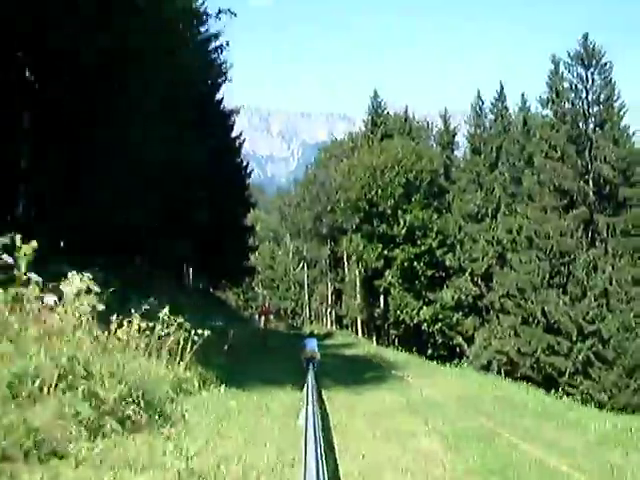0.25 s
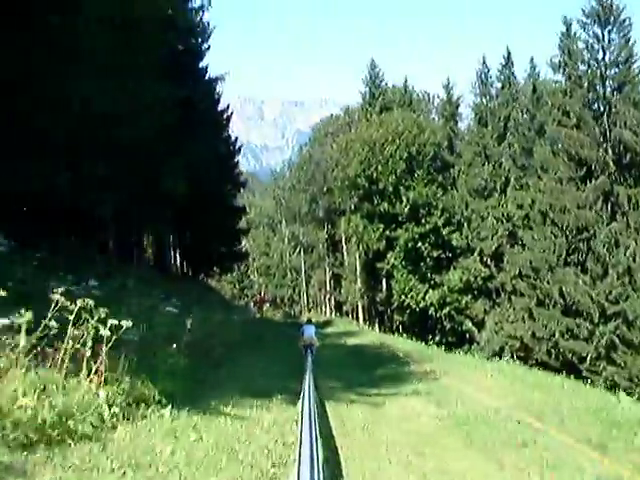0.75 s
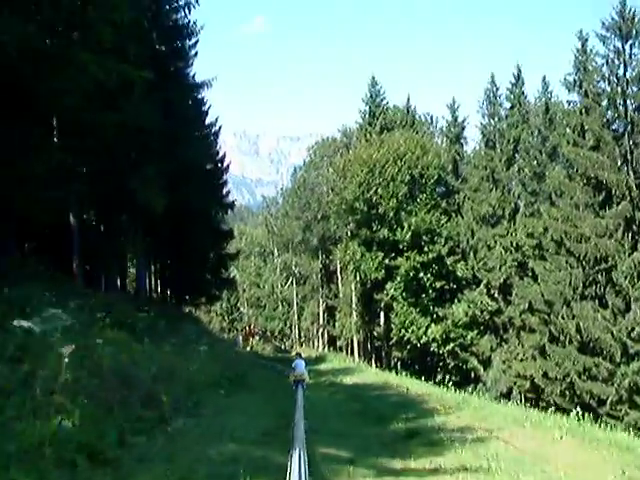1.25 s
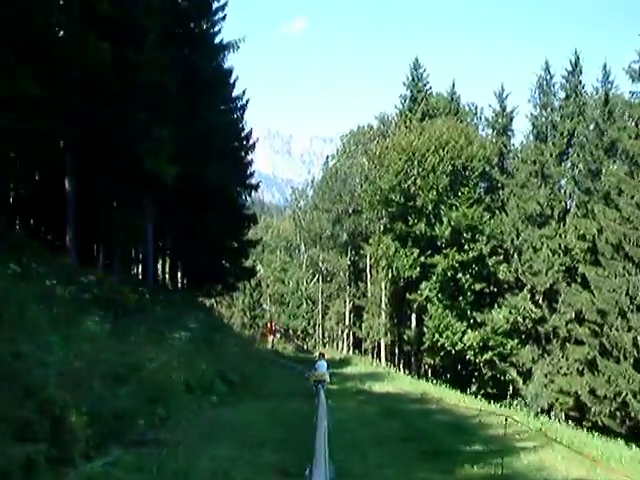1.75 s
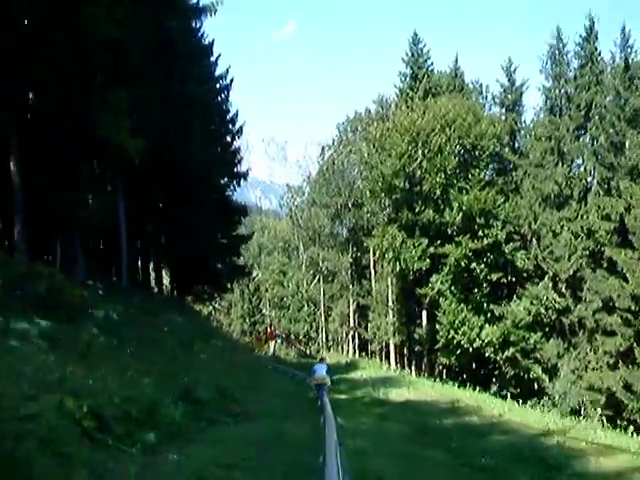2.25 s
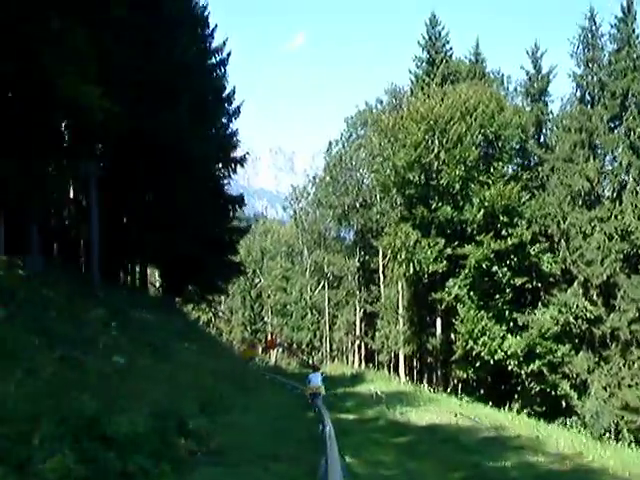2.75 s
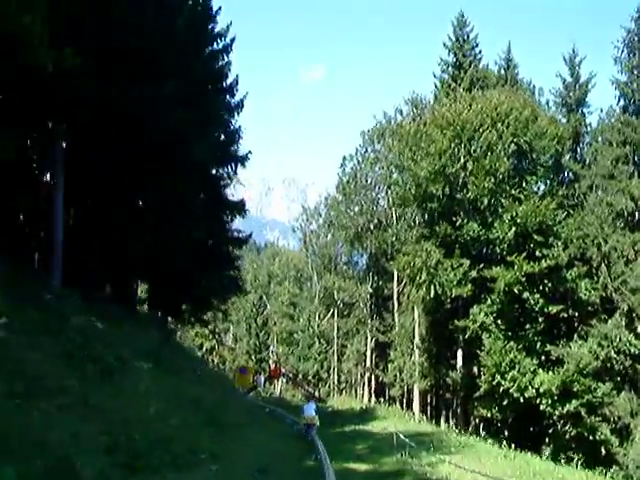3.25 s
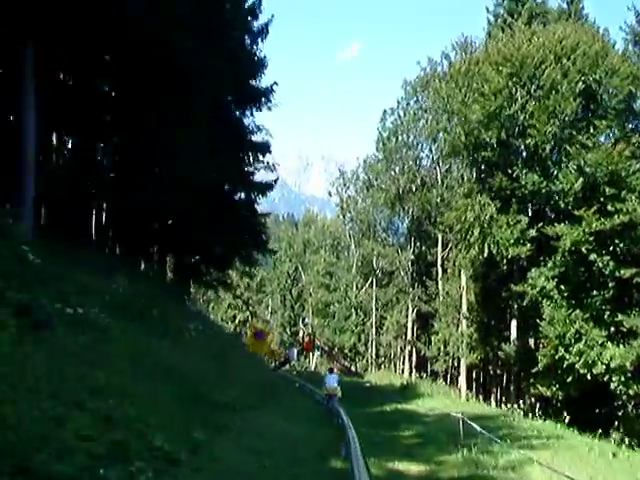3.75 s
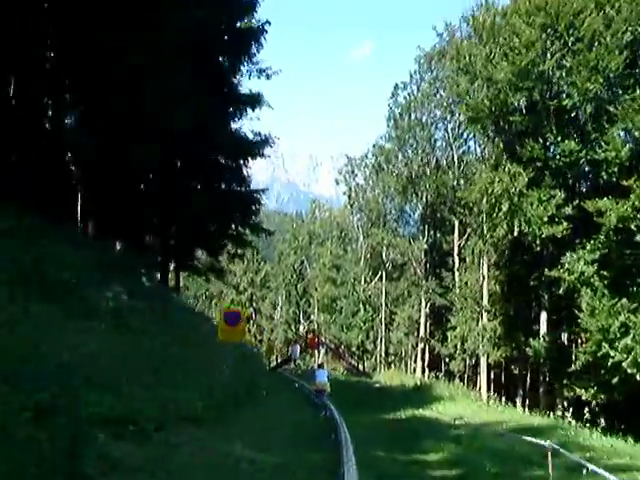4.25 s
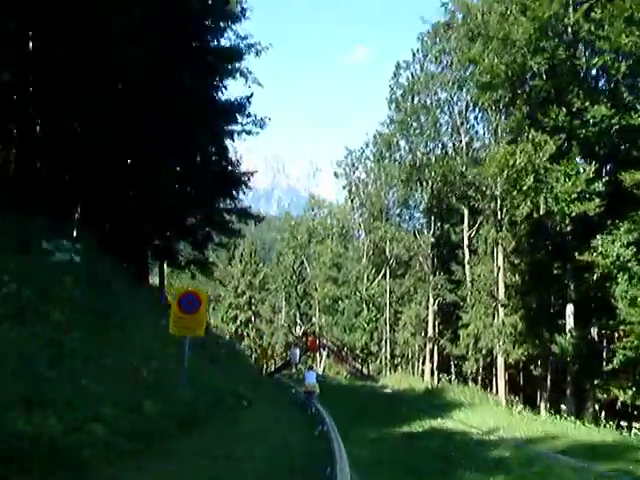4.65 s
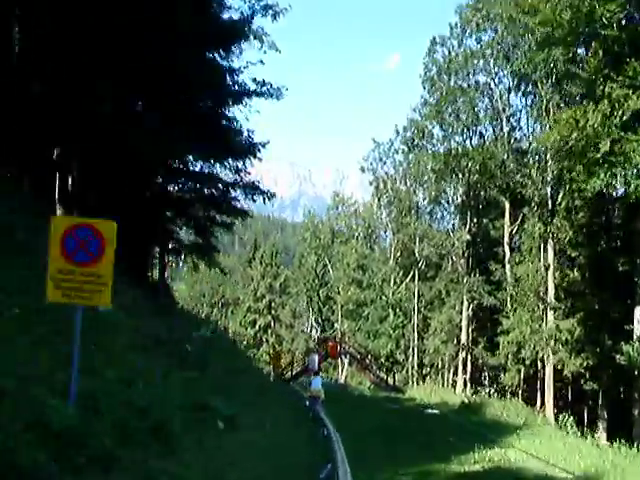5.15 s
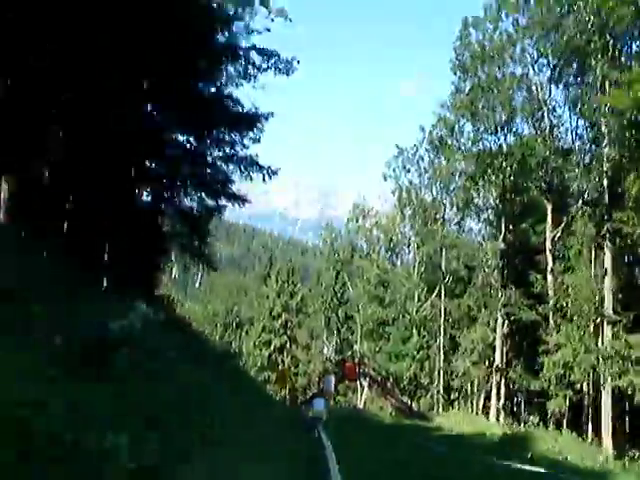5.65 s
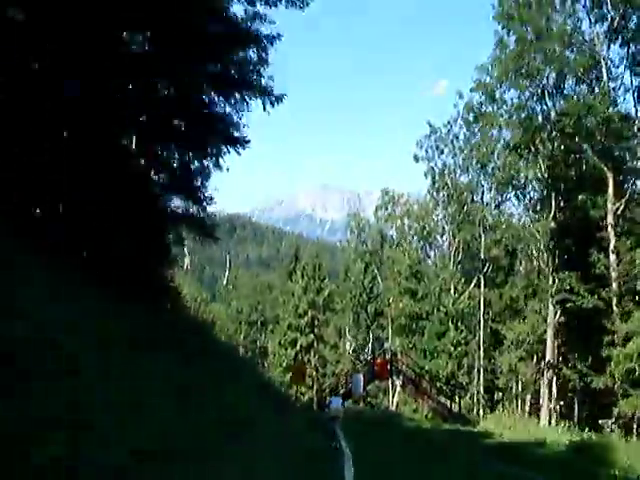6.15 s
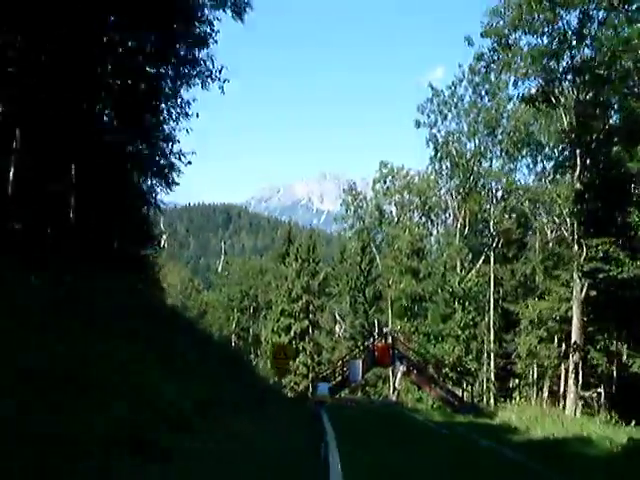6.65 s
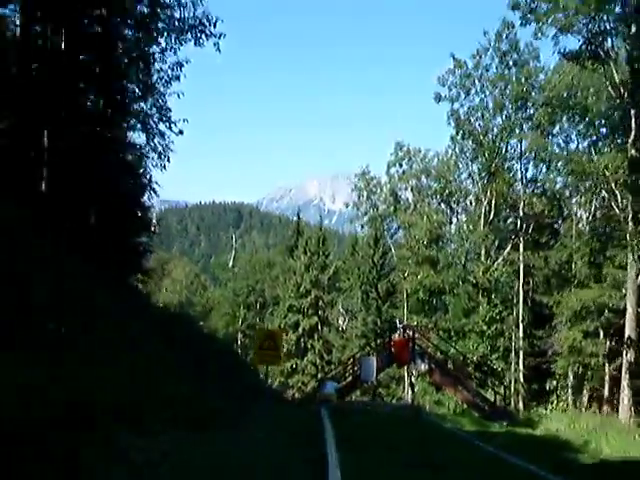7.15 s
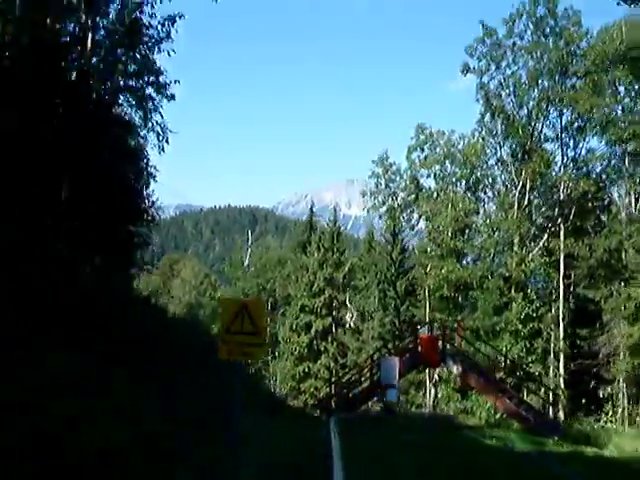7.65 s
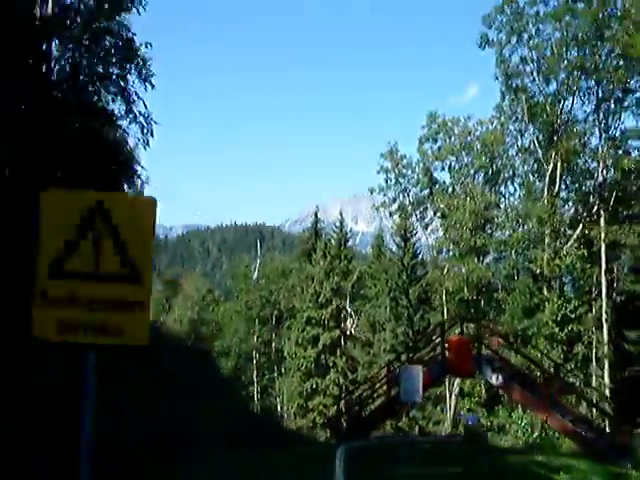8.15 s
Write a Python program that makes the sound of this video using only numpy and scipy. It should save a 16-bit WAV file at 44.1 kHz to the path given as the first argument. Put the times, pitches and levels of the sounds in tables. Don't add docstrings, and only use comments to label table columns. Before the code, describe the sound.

Continuous overloaded headwind on a bare microphone, very close, mono and lacking treble. A low, ragged roar carries clumps of gritty crackle, hard pops and tiny ticks. The balance changes restlessly: brief stronger bursts, then short slacker moments, while the deep roar stays nearly steady. The rider moves quickly downhill through open grass and forest, and the sound ends with the wind still blowing hard.

```python
import sys
import numpy as np
from scipy import signal
from scipy.fft import rfft, irfft, next_fast_len
from scipy.io import wavfile

SR = 44100
rng = np.random.default_rng(int(sys.argv[2]) if len(sys.argv) > 2 else 0)


def natural_amplitude(level_db):
    exponent = np.asarray(level_db, float) / 20
    return 10 ** exponent


def int16_out(signal):
    q = np.round(np.clip(np.atleast_2d(signal).T, -1, 1) * 32767)
    wavfile.write(sys.argv[1], SR, q.astype(np.int16))


N = 370881
FULL_SCALE = 0.707

# time in seconds, tick level in dB.
SUCTION = [(.0479, -37), (.1217, -40), (.3195, -32), (.6949, -33), (1.0612, -35), (1.1375, -33),
           (1.1859, -32), (1.3144, -38), (1.504, -34), (1.7067, -35), (2.9229, -33), (2.94, -37),
           (2.9905, -32), (3.2573, -34), (3.3292, -30), (3.5522, -29), (4.186, -31), (5.1873, -36),
           (5.5197, -31), (5.5307, -38), (5.8424, -38), (6.6026, -30), (6.8025, -40), (6.8177, -31),
           (6.9898, -35), (7.0611, -39), (7.9947, -40), (8.0826, -37), (8.3951, -36), (8.4066, -37)]
# time in seconds, tick level in dB.
GRAZES = [(.0028, -44), (.7904, -52), (1.6207, -48), (1.8475, -51), (2.6437, -40), (3.3957, -53),
          (3.8003, -40), (4.0861, -62), (4.1951, -44), (5.1088, -53), (5.3986, -46), (5.7363, -42),
          (6.8536, -43), (7.1487, -47), (8.2998, -62)]


def rms_one(x):
    return x / np.sqrt(np.mean(x ** 2) + 1e-20)


def drift(rate_hz):
    pole = np.exp(-2 * np.pi * rate_hz / SR)
    noise = rng.standard_normal(N + SR)
    settled = signal.lfilter([1], [1, -2 * pole, pole * pole], noise)[SR:]
    return rms_one(settled)


def at_times(times_s, sizes):
    train = np.zeros(N)
    train[np.minimum(np.round(np.array(times_s) * SR).astype(int), N - 1)] = sizes
    return train


def smooth(x, kernel):
    return signal.fftconvolve(x, kernel, "same")


def bumps(rows):
    t = np.arange(0, N + 32, 32) / SR
    level_db = sum(db * np.exp(-((t - s) / width) ** 2) for s, db, width in rows)
    return np.interp(np.arange(N) / SR, t, level_db)


def lulls():
    # time in seconds, change in dB, width in seconds.
    short_lulls = [(.905, -1.5, 0.016), (.98, -6, .02), (1.238, -4, 0.016), (1.81, -5.5, 0.022),
                   (1.965, -5, 0.012), (2.415, -5, 0.012), (2.455, 0.5, 0.0086), (2.54, -1.5, .01),
                   (4.07, -3, .012), (4.35, 0, .012), (4.499, -3, 0.0097), (5.83, 1.5, 0.0089),
                   (6.46, -6, 0.0093), (8.335, -7, .015)]
    return natural_amplitude(bumps(short_lulls))


def wind_gain(size_index):
    # time in seconds, level in dB.
    gust = [(0.0, -24.5), (0.04, -28.5), (1.19, -27), (1.24, -36), (1.26, -26), (2.29, -27.5), (2.34, -29),
            (3.87, -25.5), (4.0, -29.5), (4.17, -26), (4.59, -30), (4.78, -27), (6.44, -27), (6.49, -30.5),
            (6.6, -26), (6.65, -27.5), (8.25, -25.5), (8.41, -27.5)]
    # time in seconds, change in dB, width in seconds.
    puffs = [(.3, 2.5, 0.089), (.4, -3, 0.036), (1.1, 1.5, 0.068), (1.4, -5, 0.078), (2.4, -5.5, 0.1),
             (2.8, -4, 0.062), (3.3, 3, 0.086), (3.7, 3, 0.05), (4.0, -5, .06), (4.2, 3.5, 0.078),
             (4.6, -1.5, .08), (5.4, -3, 0.071), (5.6, 2, 0.041), (5.7, -2.5, 0.046), (6.4, 1.5, 0.037),
             (6.5, -4.5, .05), (6.6, 6.5, 0.035), (7.0, 1, 0.082), (7.2, -5, 0.11), (7.6, -2, 0.064),
             (8.1, 4, 0.047)]
    # level in dB at mean wind,
    # share of the wind's swing [ratio], own wander in dB.
    eddy_sizes = [(-15.5, 0.035, .5), (-20.5, 0.28, -0.5), (-30, 0.84, 0.63)]
    swing_db = np.interp(np.arange(N) / SR, *np.transpose(gust))
    swing_db = swing_db - swing_db.mean() + bumps(puffs)
    level_db, share, wander_db = eddy_sizes[size_index]
    return natural_amplitude(level_db + share * swing_db + wander_db * drift(3.0))


def headwind(burst_db, own_db, steep):
    # frequency in Hz, level in dB per Hz.
    port_colour = [(24, -56.5), (40, -30), (183, -2), (314, 1.5), (1820, -15.5), (2670, -24), (3630, -35),
                   (4000, -40), (5200, -72.5), (8800, -120)]
    roar_top_hz, middle_top_hz = 600, 1500
    bursts = rms_one(0.5 * drift(52) + 0.5 * drift(130) + 3.3 * drift(600))
    bursts = 2.46 * np.tanh(bursts / 2)
    size = next_fast_len(N)
    log_hz = np.log2(np.maximum(np.arange(size // 2 + 1) * SR / size, 1))
    colour_hz, colour_db = np.transpose(port_colour)
    colour = natural_amplitude(np.interp(log_hz, np.log2(colour_hz), colour_db))
    white = rng.standard_normal(N)
    groups = np.zeros((3, size // 2 + 1), complex)
    for centre in np.arange(4.5, 12.6, 0.5):
        hz = 2 ** centre
        depth = (min(hz, 2600) / 2000) ** steep
        burst_level_db = depth * (burst_db * bursts + own_db * drift(hz / 30))
        lumpy = rms_one(white * natural_amplitude(burst_level_db))
        window = np.cos(np.pi * np.clip(log_hz - centre, -0.5, 0.5)) ** 2
        group = int(hz > roar_top_hz) + int(hz > middle_top_hz)
        groups[group] += rfft(lumpy, size) * window * colour
    return sum(wind_gain(k) * rms_one(irfft(group, size)[:N]) for k, group in enumerate(groups))


def eddy():
    dip_s, rebound_s, late_share = 0.00018, 0.0014, 0.19
    t = np.arange(-220, 221) / SR
    dip = np.exp(-(t / dip_s) ** 2)
    rebound = (t / rebound_s) ** 2 * np.exp(-(t / rebound_s) ** 2) * (1 + late_share * np.sign(t))
    return rebound * dip.sum() / rebound.sum() - dip


def crackle(per_s, spread_db, gain_db):
    born = rng.random(N) < per_s * natural_amplitude(3.0 * drift(45)) / SR
    sizes = natural_amplitude(spread_db * np.minimum(rng.exponential(1, N), 3))
    return wind_gain(2) * natural_amplitude(gain_db) * rms_one(smooth(born * sizes, eddy()))


def flutter():
    shiver_hz, decay_s, share = 2100, 0.00044, 0.45
    t = np.arange(-220, 221) / SR
    decay = (t > 0) * np.exp(-(t / decay_s) ** 2)
    shiver = -decay * np.sin(np.pi * shiver_hz * t) ** 2 * np.cos(2 * np.pi * shiver_hz * t)
    bell = np.hanning(len(t))
    shiver = shiver - shiver.sum() * bell / bell.sum()
    return (1 - share / 2) * eddy() + share * shiver


def snaps(gain_db, per_s, stray_db, spread_db):
    # time of the first tug in seconds, dip level in dB.
    sharp_eddies = [(0.0797, -8), (0.109, -13), (0.2623, -8), (0.33, -9), (0.5118, -7), (0.5407, -10),
                    (0.559, -13), (0.7277, -6.5), (1.257, -17), (1.6857, -13), (1.7656, -11), (1.9324, -13),
                    (1.9839, -14), (2.2366, -11), (2.4658, -18), (2.5496, -16), (2.7033, -14.5),
                    (4.085, -15.5), (4.362, -13), (4.715, -14), (5.1364, -8), (5.9548, -10), (6.2957, -11),
                    (6.355, -9), (6.912, -12), (7.458, -11), (7.6428, -14), (7.7563, -11), (7.864, -14),
                    (8.2454, -13)]
    tug_to_bottom_s = 0.0007
    s, db = np.transpose(sharp_eddies)
    wind = wind_gain(2)
    born = rng.random(N) < per_s * wind / wind.mean() / SR
    stray = born * natural_amplitude(stray_db + spread_db * np.clip(rng.standard_normal(N), -2, 1.5))
    return smooth(at_times(s + tug_to_bottom_s, natural_amplitude(db + gain_db)) + stray, flutter())


def scene():
    flow = headwind(burst_db=6.0, own_db=0.4, steep=0.73)
    flow = flow + crackle(per_s=600.0, spread_db=4.0, gain_db=2.5)
    sharp = snaps(gain_db=7.0, per_s=40.0, stray_db=-9.5, spread_db=4.0)
    return (lulls() * flow + sharp)[None]


def calm_before_suction(x, width_s):
    t = np.arange(-120, 121) / SR
    share = smooth(at_times(np.array(SUCTION + GRAZES)[:, 0], 1), np.exp(-(t / width_s) ** 4))
    return x * (1 - np.clip(share, 0, 1))


def suction_peaks(x, top_cut, excess_db):
    s, db = np.transpose(SUCTION + GRAZES)
    shape = smooth(eddy(), top_cut)
    pull = x[np.round(s * SR).astype(int)] + FULL_SCALE + natural_amplitude(1.07 * db + excess_db)
    return x + smooth(at_times(s, pull), shape / -shape.min())


def low_pass(x):
    return signal.sosfilt(signal.butter(12, 15850, fs=SR, output="sos"), x)


def record(dry):
    offset, lower_rail, upper_rail = 0.032, -0.65, 0.65
    step_noise_db, hiss_db = -49.5, -101
    coupling_hz, converter_hz = 39.3, 4100
    flow = calm_before_suction(dry[0], width_s=0.0004)
    railed = np.clip(flow + offset, lower_rail, upper_rail)
    railed = railed + natural_amplitude(step_noise_db) * rng.standard_normal(N)
    low_cut = signal.butter(2, coupling_hz, "high", fs=SR, output="sos")
    railed = offset + signal.sosfiltfilt(low_cut, railed)
    top_cut = signal.firwin(181, converter_hz, window=("kaiser", 9), fs=SR)
    narrow = suction_peaks(smooth(railed, top_cut), top_cut, excess_db=10.5)
    cut = np.clip(narrow, -FULL_SCALE, FULL_SCALE)
    mix = cut + natural_amplitude(hiss_db) * rng.standard_normal(N)
    return low_pass(mix[None])


dry = scene()
out = record(dry)
int16_out(out)
```